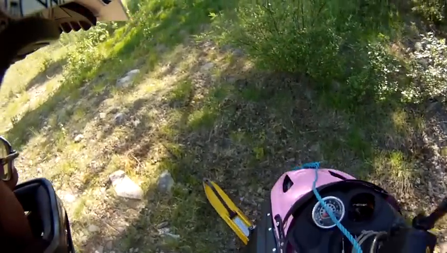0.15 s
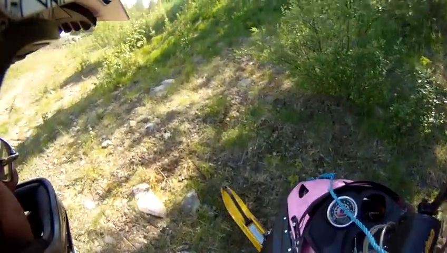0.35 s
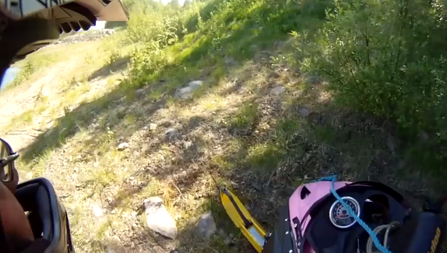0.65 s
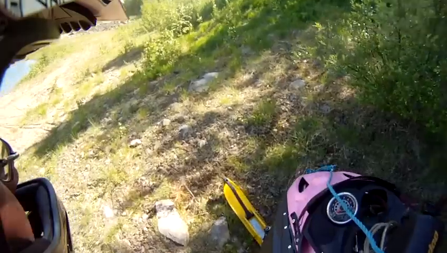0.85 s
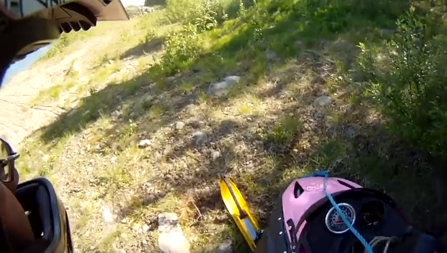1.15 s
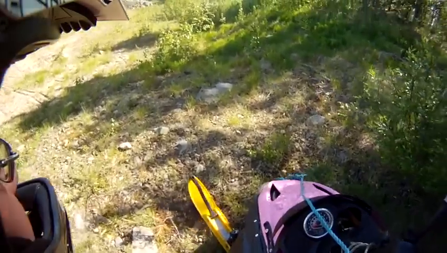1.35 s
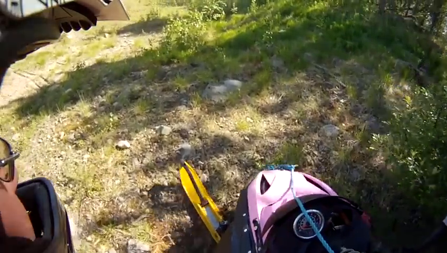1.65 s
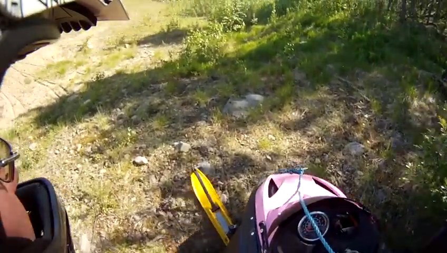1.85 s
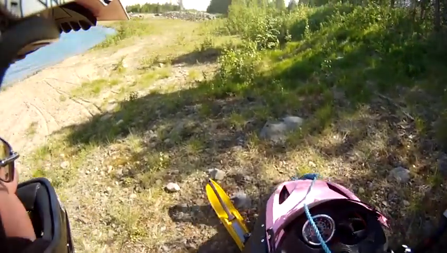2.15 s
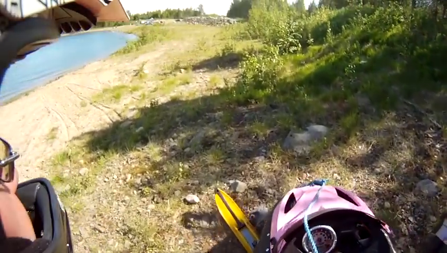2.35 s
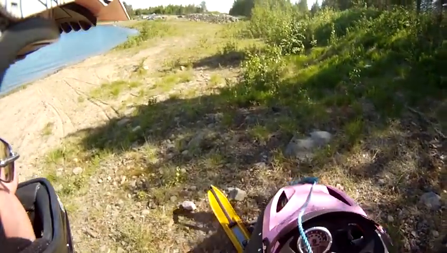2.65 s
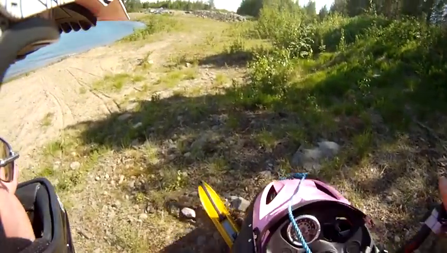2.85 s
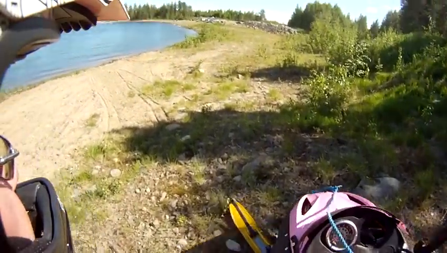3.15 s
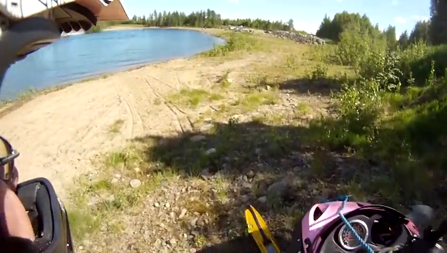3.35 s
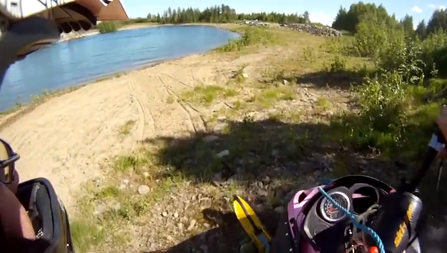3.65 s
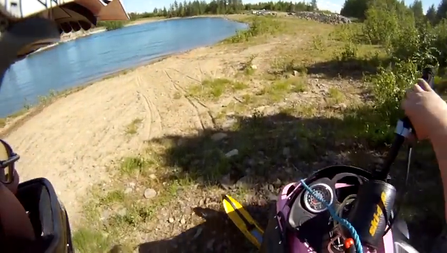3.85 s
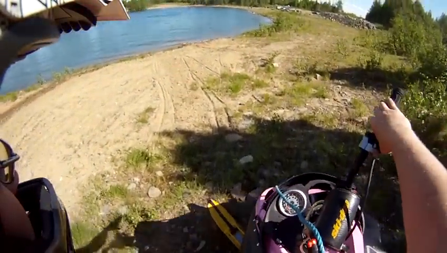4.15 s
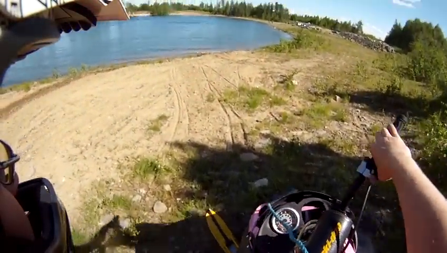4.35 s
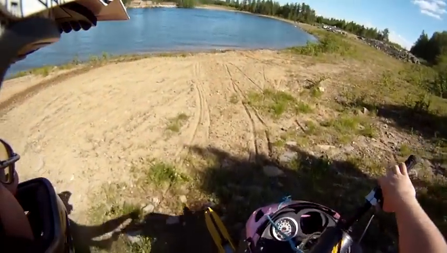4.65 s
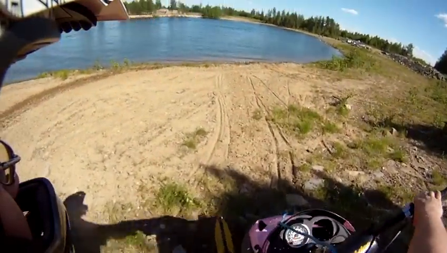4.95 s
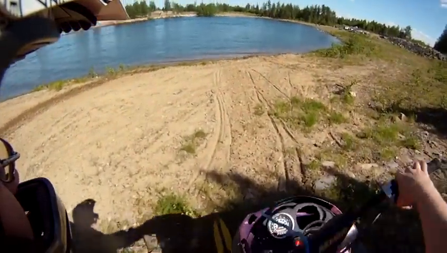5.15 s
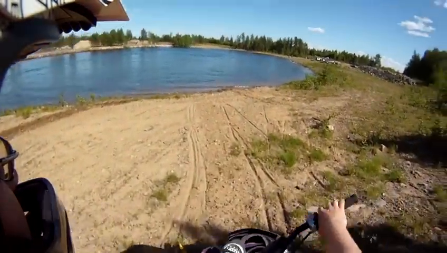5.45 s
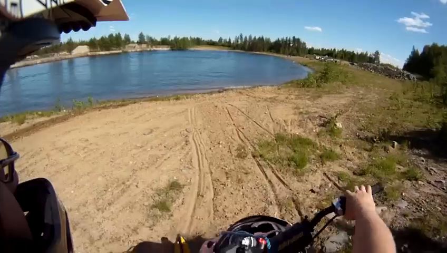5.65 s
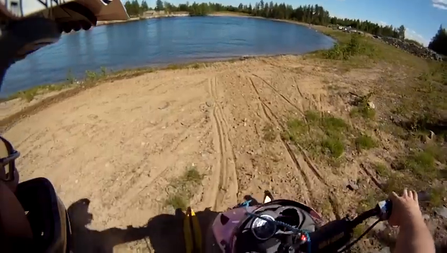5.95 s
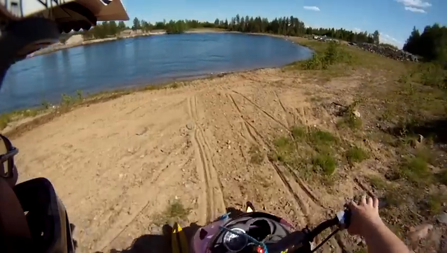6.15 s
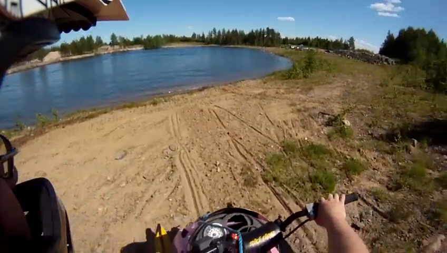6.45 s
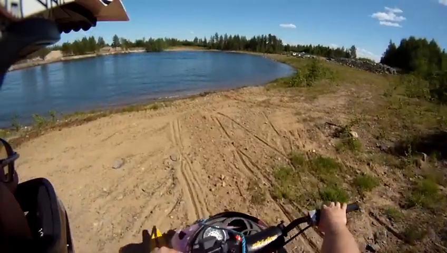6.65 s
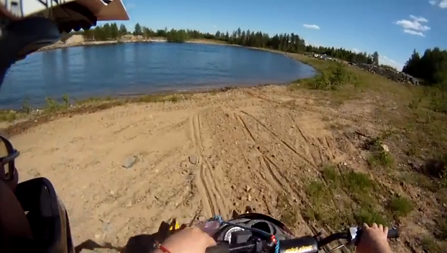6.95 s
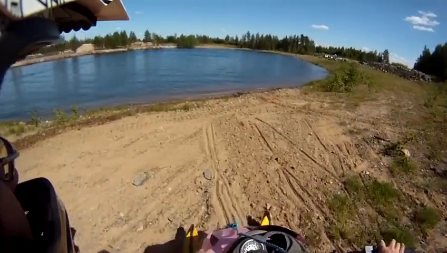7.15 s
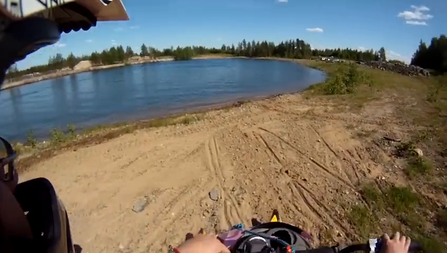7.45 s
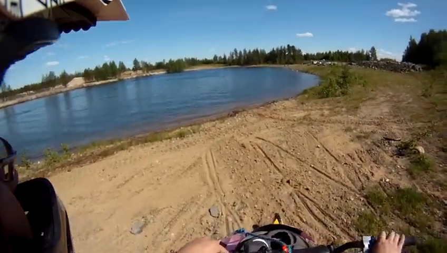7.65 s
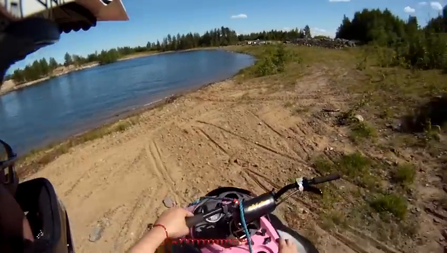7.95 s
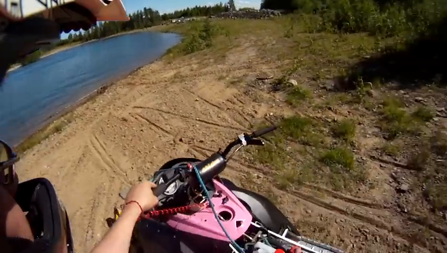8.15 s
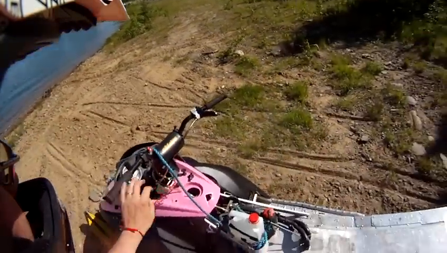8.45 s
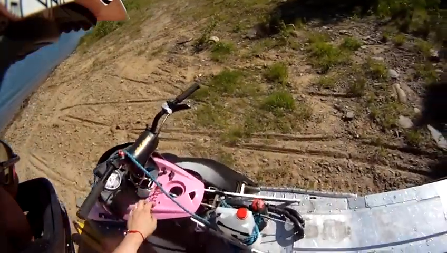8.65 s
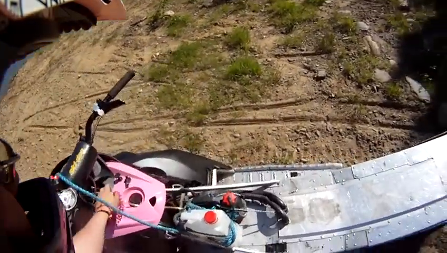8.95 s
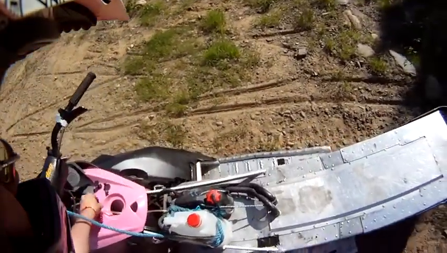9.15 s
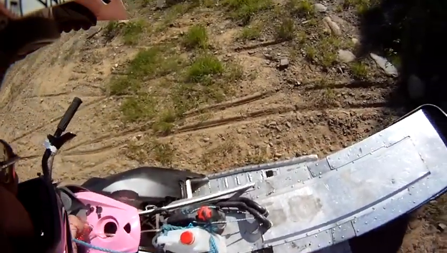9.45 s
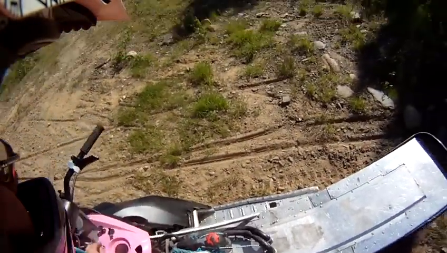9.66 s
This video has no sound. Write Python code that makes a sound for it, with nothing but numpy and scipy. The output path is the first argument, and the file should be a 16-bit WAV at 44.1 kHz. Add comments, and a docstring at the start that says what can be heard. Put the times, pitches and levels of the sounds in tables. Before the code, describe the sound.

Close and boxy, from a helmet microphone in a closed case: a low two-stroke drone with uneven pops, hard clanks and a rattling track on gravel. After a few uneven seconds the speed eases, knocks become sparse and the engine settles into a soft, sputtering idle. Low wind thumps pass by, a thin whine joins late, and finally the engine is switched off, its note dropping. The treble is coarse and metallic.

```python
"""Snowmobile on gravel

A two-cylinder two-stroke creeps over gravel, slows to a lumpy idle and is switched off. The exhaust is a sum of
crank orders with pipe pops; clatter, running gear and chassis drone are noise and knocks through ringing modes.
A thin whine joins at idle, over low lumps of wind. It is heard from a helmet, in a closed camera case, through a
converter that holds each sample and so mirrors the sound into the treble."""
import sys
import numpy as np
from scipy import signal
from scipy.io import wavfile
from scipy.ndimage import uniform_filter1d

SR = 44100
rng = np.random.default_rng(int(sys.argv[2]) if len(sys.argv) > 2 else 0)


def master_out(mix):
    """Clip the mix to full scale and print it as 16-bit PCM to the path in sys.argv[1]."""
    frames = np.transpose(np.atleast_2d(mix))
    ceiling = np.clip(frames, -1, 1)
    pcm = np.round(ceiling * 32767).astype(np.int16)
    wavfile.write(sys.argv[1], SR, pcm)


N = 432621
TIME_S = np.arange(N) / SR
RING_HZ = np.fft.rfftfreq(2 ** 15, 1 / SR)
IGNITION_OFF_S = 9.45
SPARK_ON = np.arange(N) < IGNITION_OFF_S * SR


def gain_of(db):
    """Amplitude factor of a level in dB."""
    return 10 ** (np.asarray(db) / 20)


def evened(x):
    """Signal scaled to rms 1."""
    return x / np.sqrt(np.mean(x ** 2) + 1e-20)


def curves(rows):
    """Columns of a breakpoint table, read at every sample."""
    times_s, *columns = np.transpose(rows)
    return [np.interp(TIME_S, times_s, column) for column in columns]


def flutter(seconds):
    """Slow random drift of rms 1: noise smoothed twice over this many seconds."""
    size = max(round(seconds * SR), 2)
    smoothed = uniform_filter1d(rng.standard_normal(N), size)
    return evened(uniform_filter1d(smoothed, size))


def swell(rise_s, fall_s):
    """Times around a peak, and a soft rise with an exponential fall."""
    t = np.arange(-3000, 3001) / SR
    return t, np.where(t < 0, np.exp(-(t / rise_s) ** 2), np.exp(-abs(t) / fall_s))


def bursts(spikes, rise_s, fall_s):
    """Envelope with one swell peaking at each spike."""
    return signal.oaconvolve(spikes, swell(rise_s, fall_s)[1], "same")


def train(events):
    """One spike for each (peak_s, strength_db)."""
    peak_s, strength_db = np.transpose(events)
    spikes = np.zeros(N)
    spikes[(peak_s * SR).astype(int)] = gain_of(strength_db)
    return spikes


def chance_train(per_s, db, spread_db):
    """Spikes at random moments, their levels scattered around a curve."""
    return (rng.random(N) < per_s / SR) * gain_of(db + spread_db * rng.standard_normal(N))


def causal(gain):
    """Minimum-phase ring of a filter with this gain: it starts only when it is struck."""
    log_gain = np.log(np.maximum(np.r_[gain, gain[-2:0:-1]], 1e-5))
    response = np.exp(np.conj(signal.hilbert(log_gain)))
    struck = np.fft.ifft(response).real[:len(gain) // 2]
    return struck / np.linalg.norm(struck)


def ring(modes, column):
    """Ring of a table of resonant modes, balanced by the levels of one column."""
    power = 0
    for mode in modes:
        detune = 2 * (RING_HZ - mode[0]) / mode[1]
        power = power + gain_of(mode[column]) ** 2 / (1 + detune ** 2) ** 2
    return causal(np.sqrt(power))


# Crank speed and exhaust hum: time_s [s], port_openings_hz [Hz], hum_db [dB rms before unevenness and sag]
CRANK_CURVE = [(0, 135.6, -32), (.2, 126.9, -31), (.45, 122.1, -29.5), (.8, 123.5, -39), (1.04, 124.3, -30),
               (1.2, 134.5, -31), (1.5, 123.8, -29.5), (1.77, 127, -28.5), (1.9, 137, -30),
               (2.14, 119.9, -30.5), (2.35, 118.2, -38), (2.54, 124.2, -29), (2.66, 145, -24),
               (2.74, 147, -35), (2.88, 128, -33), (3.2, 128.6, -35), (3.4, 124.7, -30.5),
               (3.76, 118.6, -30), (4.75, 107, -32), (5.57, 101.7, -34), (7.0, 84.83, -37.5),
               (8.5, 84.4, -38), (9.34, 79.75, -43), (9.48, 75.5, -41), (9.62, 67.3, -49),
               (9.81, 50.8, -52)]


def crankshaft():
    """Port-opening rate sets the pitch; its wobbling sum counts cycles, and slowing moves load to idle."""
    hz, hum_db = curves(CRANK_CURVE)
    idle = np.clip((106 - hz) / 17, 0, 1)  # 0 under load, 1 at idle speed
    wobble = (.004 + .005 * idle) * flutter(.03)
    cycles = np.cumsum(hz * (1 + wobble)) / SR
    return hz, hum_db, idle, cycles


# Strongest charges that really burn: peak_s [s, pop at its loudest, before shifting to a crest],
# strength_db [dB, relative]
STRONG_FIRINGS = [(.022, -13), (.056, -11), (.117, -15), (.19, -14.5), (.265, -21), (.486, -11.5),
                  (.566, -20), (.636, -10), (.733, -16), (.76, -11), (.795, -12), (.827, -15), (.88, -11),
                  (.909, -22), (.97, -16), (1.047, -10), (1.085, -11), (1.119, -15), (1.159, -15),
                  (1.188, -10), (1.219, -16), (1.252, -20), (1.278, -12), (1.485, -14), (1.6, -17),
                  (1.73, -15), (1.794, -22), (1.854, -17), (1.881, -12), (1.912, -13), (1.976, -16),
                  (2.011, -24), (2.109, -17), (2.209, -24), (2.276, -14), (2.314, -9), (2.344, -18),
                  (2.389, -14), (2.448, -11.5), (2.512, -19), (2.543, -21), (2.577, -16), (2.707, -19),
                  (2.729, -15), (2.758, -12), (2.79, -24), (2.934, -14), (2.969, -12), (2.998, -13),
                  (3.025, -21), (3.051, -12), (3.081, -13), (3.12, -14), (3.156, -11), (3.194, -12),
                  (3.23, -17), (3.612, -18), (3.901, -21), (4.031, -15), (4.364, -19), (4.895, -17),
                  (4.987, -29), (5.156, -27), (5.27, -19), (5.336, -22), (5.67, -21), (5.771, -20),
                  (6.111, -19.5), (6.206, -23), (6.274, -20), (6.384, -16), (6.443, -21), (6.685, -22.5),
                  (6.778, -27), (6.836, -19.5), (6.987, -22), (7.057, -22), (7.095, -22.5), (7.247, -22),
                  (7.33, -26), (7.434, -23), (7.52, -18.5), (7.624, -20.5), (7.765, -18.5), (7.86, -19.5),
                  (7.976, -18), (8.035, -20.5), (8.181, -20), (8.262, -20.5), (8.417, -20), (8.454, -18),
                  (8.596, -18), (8.632, -23), (8.689, -22), (8.863, -18.5), (8.983, -16), (9.083, -18),
                  (9.156, -18), (9.255, -19), (9.292, -21), (9.33, -21), (9.357, -21), (9.418, -19.5)]
# Half-burnt charges between them, on the same strength scale
WEAK_FIRINGS_PER_S, WEAK_LOAD_DB, WEAK_IDLE_DB, WEAK_SPREAD_DB = 11, -31, -29.5, 0.5


def firings(cycles, idle):
    """Strong and weak charges; under load each rides the nearest crest of the hum."""
    weak_db = WEAK_LOAD_DB + idle * (WEAK_IDLE_DB - WEAK_LOAD_DB)
    weak = chance_train(WEAK_FIRINGS_PER_S, weak_db, WEAK_SPREAD_DB)
    charges = train(STRONG_FIRINGS) + weak * SPARK_ON
    at = np.flatnonzero(charges)
    crests = np.flatnonzero(np.diff(np.floor(cycles)))
    lag = crests[abs(crests[:, None] - at).argmin(0)] - at
    shifted = at + (lag * (1 - idle[at])).astype(int)  # at full idle the charges stay loose
    return np.bincount(shifted, charges[at], N)


# Higher crank orders: multiple [x port openings], load_db, idle_db, coast_db [dB rms before lift, unevenness
# and sag; coast is without spark], waver_db [dB rms]
CRANK_ORDERS = [(2, -54, -47, -31, 2.5), (2.5, -56, -63, -67.5, 4), (3, -51.5, -52.5, -57, 1.7),
                (3.5, -51, -66, -69, 2.5), (4, -49, -63.5, -75, 1.5), (5, -60, -66, -75, 6),
                (6, -61, -63, -77, 1)]
LIFT_HZ, LIFT_WIDTH_HZ, LIFT_DB = 314.4, 81, 9  # pipe resonance
ORDER_WAVER_S, COAST_RISE_S = 0.11, 0.086


def orders_db(hz, idle):
    """An order swells as it crosses the pipe's resonance and wavers slowly, until the spark stops."""
    coast = np.clip((TIME_S - IGNITION_OFF_S) / COAST_RISE_S, 0, 1)
    levels = []
    for multiple, load_db, idle_db, coast_db, waver_db in CRANK_ORDERS:
        detune = 2 * (multiple * hz - LIFT_HZ) / LIFT_WIDTH_HZ
        lift_db = LIFT_DB / (1 + detune ** 4)
        fired_db = load_db + idle * (idle_db - load_db) + waver_db * flutter(ORDER_WAVER_S) + lift_db
        levels.append(coast * coast_db + (1 - coast) * fired_db)
    return levels


# Pipe's answer to a burning charge: pitch_hz [Hz], load_db, idle_db [dB over charge strength, before the
# bass cut], rise_s, fall_s [s]
PIPE_POPS = [(96, -12, -10, 0.0099, 0.025), (117, -13, -5.5, 0.0047, 0.0099),
             (330.05, -45, -19, 0.002, 0.0025)]
SAG_DB, SAG_LAG_S, SAG_WIDTH_S = 15, 0.015, 0.0074  # depth follows charge strength


def exhaust(harmonics_db, cycles, idle, charges):
    """Pumped gas hums, unevenly until the spark stops; a burning charge pops the pipe, then the hum sags."""
    uneven_db = SPARK_ON * (1.1 + .8 * idle)
    multiples = [1] + [row[0] for row in CRANK_ORDERS]
    hum = 0
    for multiple, db in zip(multiples, harmonics_db):
        level = np.sqrt(2) * gain_of(db + uneven_db * flutter(0.036))
        hum = hum + level * np.cos(2 * np.pi * multiple * cycles)
    late_charges = np.roll(charges, round(SAG_LAG_S * SR))
    sag = bursts(late_charges, SAG_WIDTH_S, SAG_WIDTH_S)
    hum = hum / (1 + gain_of(SAG_DB) * sag)

    pops = 0
    for hz, load_db, idle_db, rise_s, fall_s in PIPE_POPS:
        t, shape = swell(rise_s, fall_s)
        struck = charges * gain_of(load_db + idle * (idle_db - load_db))
        pops = pops + signal.oaconvolve(struck, shape * np.cos(2 * np.pi * hz * t), "same")
    bass_cut = signal.butter(6, 80.0, "highpass", fs=SR, output="sos")  # the pipe passes no deep bass
    return hum + signal.sosfiltfilt(bass_cut, pops)


# Modes of machine and camera case ringing together: pitch_hz [Hz], width_hz [Hz], engine_db, gear_db,
# knock_db, idle_engine_db [dB, relative within each column]
BODY_MODES = [(1006, 124, -7, -32, -22, -5.5), (1163, 190, -8, -24, -35, -6.5),
              (1492, 106, 2, -4.5, -19, 0), (1604, 101, 2.5, 0.5, -6, -4.5),
              (1773, 197, -0.5, -33, -7, -2.5), (1878, 91, 2, -3, -10, -0.5), (2072, 73, -13, 6.5, 0.5, -7),
              (2161, 48, -3.5, 5.5, 13, -7.5), (2228, 120, -8, 4.5, -14, -8.5),
              (2344, 66, 1, -5.5, 5, -8.5), (2423, 144, -6.5, -12, -4, -8),
              (2550, 100, -11.5, -7, -34, -6.5), (2693, 130, -8, -5, -3, -9),
              (2957, 180, -10, -21, -8, -11.5), (3186, 190, -19.5, -16, -40, -18.5),
              (3570, 390, -16.5, -11, -48, -16.5), (3762, 221, -8.5, -13, -16.5, -10),
              (4340, 1200, -26.5, -26, -31, -28), (4795, 170, -21.5, -46, -28, -17),
              (5155, 140, -15, -22, -33, -16), (5370, 1150, -24, -36.5, -23, -24)]


def engine(level_db, idle, charges):
    """Gas rush and piston clatter, cracking at each firing; the ring's colour shifts toward idle."""
    rush = evened(gain_of(0.72 * flutter(0.028))) * gain_of(level_db + 0.39)
    crack = gain_of(-23.0 + 6.1 * idle) * bursts(charges, 0.004, 0.015)
    noise = np.hypot(rush, crack) * rng.standard_normal((2, N))
    load_drive, idle_drive = noise * np.sqrt([1 - idle, idle])
    load_clatter = signal.oaconvolve(load_drive, ring(BODY_MODES, column=2))[:N]
    idle_clatter = signal.oaconvolve(idle_drive, ring(BODY_MODES, column=5))[:N]
    return load_clatter + idle_clatter


# Loudest knocks of loose metal: peak_s [s, knock at its loudest], strength_db [dB, before ringing]
LOUD_KNOCKS = [(.0403, -9), (.133, -3.5), (.2763, -9), (.3132, -8), (.4047, -14), (.597, -7), (.6444, -10),
               (.7028, -6), (.7677, -2.5), (.8435, -12), (.8987, -2.5), (1.0111, -1), (1.057, -20),
               (1.1072, -1.5), (1.1353, -10), (1.1751, -4), (1.1987, -4.5), (1.231, -7), (1.3374, -7.5),
               (1.4282, -10), (1.5399, -13), (1.6846, -13), (1.8392, -9), (1.8703, -11), (1.8956, -2),
               (1.9255, -10), (1.9894, -5), (2.0712, -15), (2.1338, -6), (2.251, -6.5), (2.2837, -10),
               (2.4025, -4.5), (2.5651, -13), (2.6528, -10), (2.7089, -9), (2.7332, -10), (2.805, -10),
               (3.0085, -6.5), (3.038, -6), (3.0999, -7.5), (3.1313, -6), (3.1783, -6), (3.2077, -1.5),
               (3.2368, -11), (3.3917, -7), (3.4456, -10), (3.5423, -13), (3.6177, -9), (3.682, -11),
               (3.7349, -12), (4.116, -8), (4.2772, -9), (4.3959, -11.5), (4.4589, -16), (4.5456, -8),
               (4.6379, -15.5), (4.8035, -11), (4.8409, -15), (4.9337, -11), (4.9571, -12), (4.972, -12),
               (5.0277, -14), (5.0464, -7), (5.0903, -13), (5.1218, -14), (5.1976, -11.5), (5.2924, -17),
               (5.3128, -8.5), (5.4078, -15), (5.689, -18), (6.107, -21), (8.594, -13.5), (8.982, -14),
               (9.083, -22), (9.155, -27)]
SMALL_KNOCKS_PER_S, SMALL_KNOCK_DB, SMALL_SPREAD_DB = 9.8, 7, 5  # level over the running gear
SHAKE_DB, SHAKE_RISE_S, SHAKE_FALL_S = -19, 0.012, 0.019  # level over the blow's strength


def running_gear(level_db, idle):
    """Uneven ticks of track, clutch and skis clump together; knocks ring the body and shake the whole gear."""
    ticks = (rng.random(N) < 3500 / SR) * gain_of(0.92 * rng.exponential(1, N)) * rng.standard_normal(N)
    small_blows = chance_train(SMALL_KNOCKS_PER_S, level_db + SMALL_KNOCK_DB, SMALL_SPREAD_DB)
    blows = train(LOUD_KNOCKS) + small_blows
    shake = gain_of(SHAKE_DB) * bursts(blows, SHAKE_RISE_S, SHAKE_FALL_S)
    shaken = np.hypot(gain_of(level_db - 1.5), shake)
    clumps = evened(gain_of(0.81 * flutter(0.0037))) * shaken
    rattle = signal.oaconvolve(evened(ticks) * clumps, ring(BODY_MODES, column=3))

    chatter = gain_of(-11.5) * bursts(blows, 0.0048, 0.0035) * rng.standard_normal(N)
    knocks = gain_of(2.0) * np.roll(blows, 40) + chatter  # the hit lands 0.9 ms after the chatter's peak
    # at idle the engine block takes the blow
    thuds = signal.oaconvolve(gain_of(-5.0) * idle ** 2 * knocks, ring(BODY_MODES, column=5))
    clanks = signal.oaconvolve((1 - idle ** 2) * knocks, ring(BODY_MODES, column=4))
    return (rattle + thuds + clanks)[:N]


# Chassis modes: pitch_hz [Hz], width_hz [Hz], level_db [dB, relative]
CHASSIS_MODES = [(111, 63, 6.5), (163.5, 51, -2.5), (262, 58, -4.5), (341, 96, -1.5), (448, 150, -6.5),
                 (490, 17.5, -2), (538, 84, -9.5), (633, 87, -7), (713.4, 22, -3.5), (777, 140, -8.5)]
RUMBLE_DB, FULL_CLATTER_DB = -32, -23.5  # drone level when the clatter is full
RUMBLE_SLOPE = 0.62  # dB of drone per dB of clatter


def rumble(clatter_db):
    """Noise rings the low chassis modes into a drone that follows the clatter."""
    level_db = RUMBLE_DB + RUMBLE_SLOPE * (clatter_db - FULL_CLATTER_DB)
    drone = signal.oaconvolve(rng.standard_normal(N), ring(CHASSIS_MODES, column=2))[:N]
    return drone * gain_of(level_db + 0.72 * flutter(0.061))


# Gusts over the breeze: peak_s [s], level_db [dB rms at the peak], length_s [s between 1/e points]
WIND_GUSTS = [(0.488, -45, .2), (0.945, -43, .08), (1.2, -47, .1), (1.58, -42, .12), (1.75, -49, .15),
              (2.16, -42, .15), (2.73, -42, .06), (3.36, -50, .2), (3.61, -35, 0.079), (3.902, -40, .12),
              (4.451, -46, .07), (5.25, -40, 0.11), (5.83, -35, .08), (6.044, -31, 0.083),
              (6.361, -26, 0.046), (6.5, -38, .04), (7.02, -42, .2), (7.62, -46, .12), (8.11, -35, .07),
              (9.59, -42, .06)]
BREEZE_DB = -49.5


def wind():
    """Low lumps of air against the case, as band-limited noise: a faint breeze with gusts."""
    band = signal.butter(3, [24, 48], "bandpass", fs=SR, output="sos")
    lumps = signal.sosfilt(band, rng.standard_normal(N))
    strength = gain_of(BREEZE_DB)
    for peak_s, db, length_s in WIND_GUSTS:
        strength = strength + gain_of(db) * np.exp(-(2 * (TIME_S - peak_s) / length_s) ** 2)
    return evened(lumps) * strength


# Thin whine at idle: time_s [s], pitch_hz [Hz], level_db [dB rms before flutter]
WHINE_CURVE = [(7.7, 629.5, -77), (8.0, 634, -55), (8.5, 664, -60), (8.9, 668, -54), (9.3, 645, -53),
               (9.6, 632, -74), (9.81, 634, -68)]


def whine():
    """A near-sine whose pitch and level waver."""
    hz, db = curves(WHINE_CURVE)
    level = np.sqrt(2) * gain_of(db + 3.3 * flutter(0.021))
    cycles = np.cumsum(hz + 6.2 * flutter(0.0202)) / SR
    return level * np.cos(2 * np.pi * cycles)


# Mechanical effort: time_s [s], clatter_db [dB, engine], gear_db [dB, running gear], both before small trims
WORK_CURVE = [(0, -21, -19), (.05, -24, -19), (.22, -23, -29), (.76, -25, -24.5), (1.17, -23, -23.5),
              (1.53, -24.5, -27.5), (1.88, -23, -22.5), (2.1, -24.5, -26.5), (2.51, -24.5, -29),
              (2.7, -20, -28), (2.92, -24, -30), (3.05, -22, -28), (3.25, -23, -25.5), (3.82, -25.5, -29.5),
              (4.72, -29, -33.5), (5.12, -30, -41), (5.165, -32.5, -48), (5.2, -30, -34), (5.4, -31, -36),
              (5.9, -34, -42), (6.17, -34, -48), (6.56, -37, -50), (7.68, -37.5, -40), (8.55, -39.5, -50),
              (9.26, -37.5, -44), (9.81, -41, -48)]


def scene():
    """One crankshaft drives exhaust and engine; gear, chassis, wind and whine are mixed with them."""
    hz, hum_db, idle, cycles = crankshaft()
    clatter_db, gear_db = curves(WORK_CURVE)
    charges = firings(cycles, idle)
    harmonics_db = [hum_db] + orders_db(hz, idle)
    machine = exhaust(harmonics_db, cycles, idle, charges) + engine(clatter_db, idle, charges)
    mix = machine + running_gear(gear_db, idle) + rumble(clatter_db) + wind() + whine()
    return mix[None]


HOLD_STEPS, EDGE_HZ = 4, 15230


def record(dry):
    """Faint hiss; 12000 samples a second, each held for four steps, mirror into the treble; then a band limit."""
    hissing = dry + gain_of(-57.0) * rng.standard_normal(N)
    coarse = signal.resample_poly(hissing, 40, 147, axis=1)
    stairs = np.repeat(coarse, HOLD_STEPS, axis=1)
    held = signal.resample_poly(stairs, 147, 160, axis=1)[:, :N]
    band_limit = signal.firwin(1023, EDGE_HZ, window=("kaiser", 6), fs=SR)
    return signal.oaconvolve(held, band_limit[None], "same")


dry = scene()
out = record(dry)
master_out(out)
```